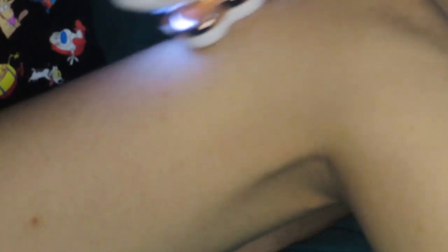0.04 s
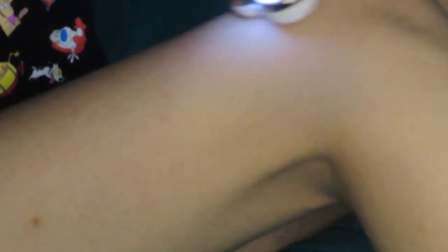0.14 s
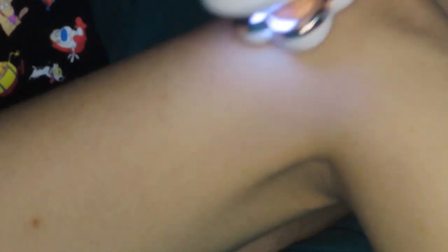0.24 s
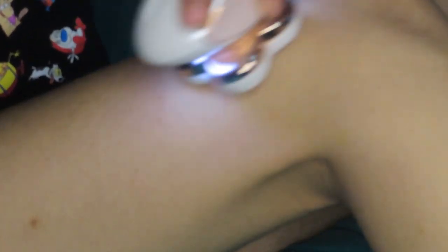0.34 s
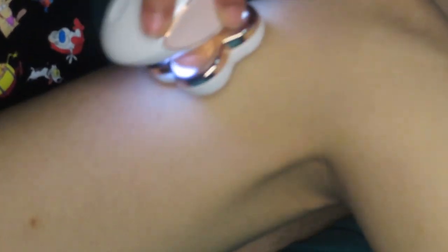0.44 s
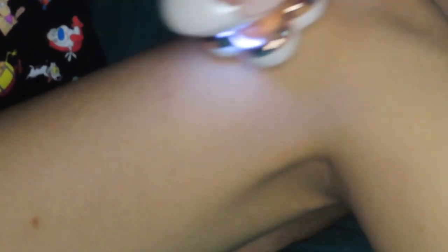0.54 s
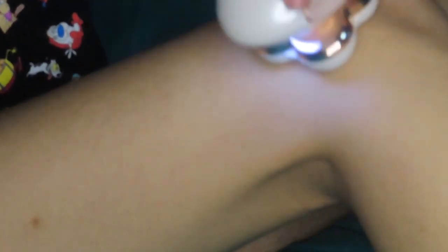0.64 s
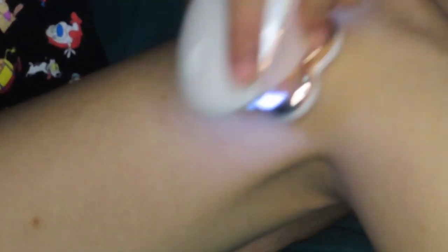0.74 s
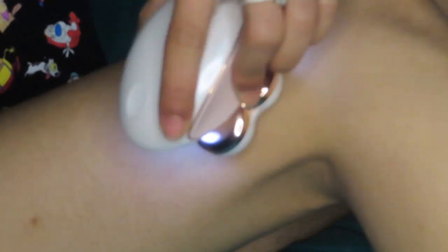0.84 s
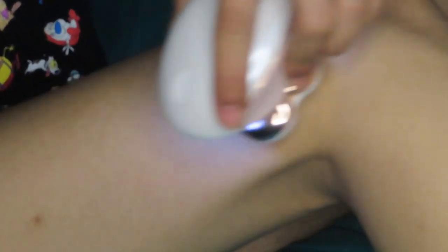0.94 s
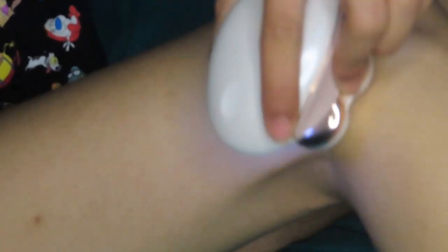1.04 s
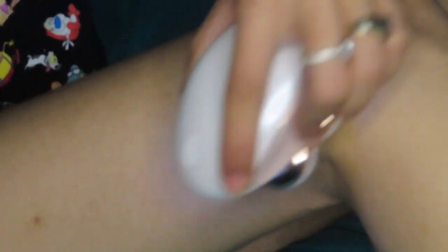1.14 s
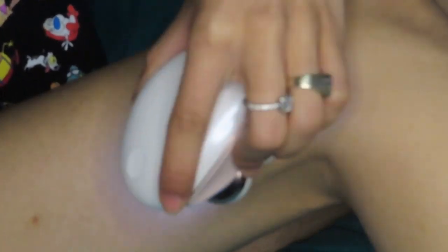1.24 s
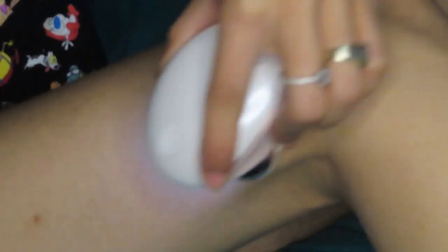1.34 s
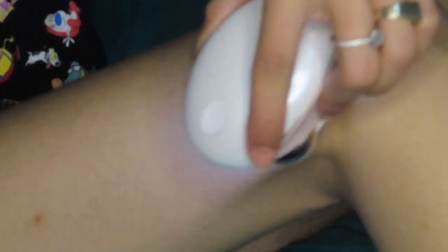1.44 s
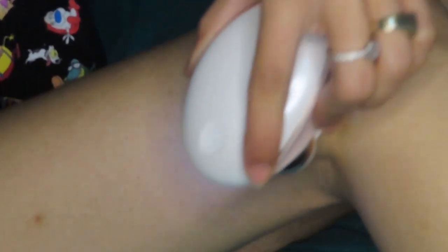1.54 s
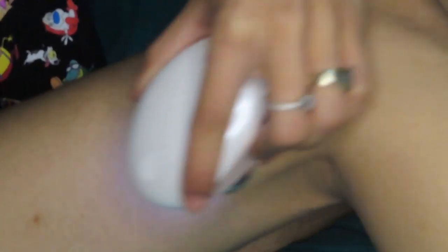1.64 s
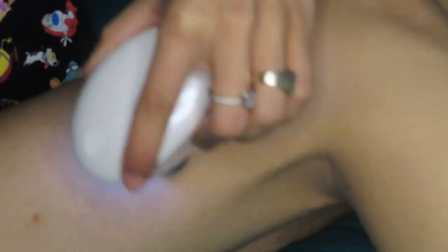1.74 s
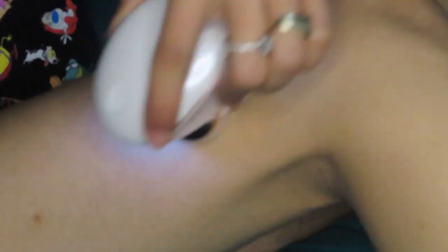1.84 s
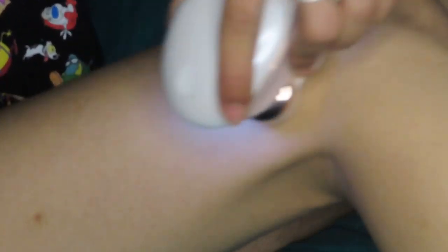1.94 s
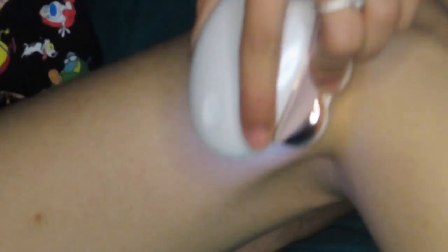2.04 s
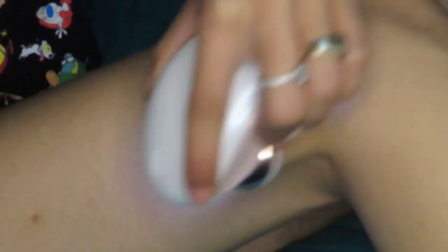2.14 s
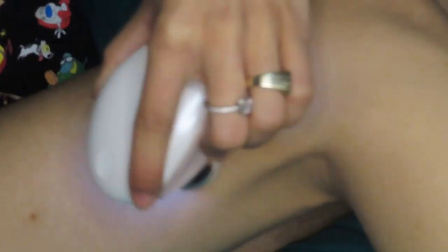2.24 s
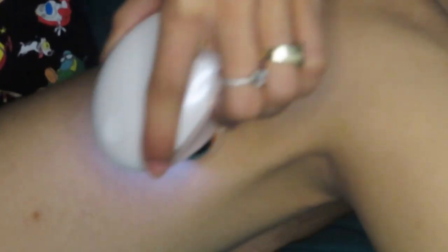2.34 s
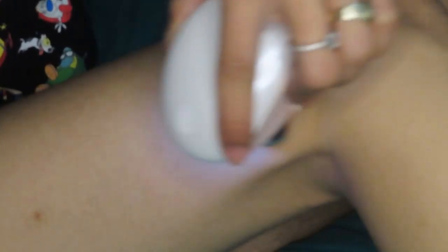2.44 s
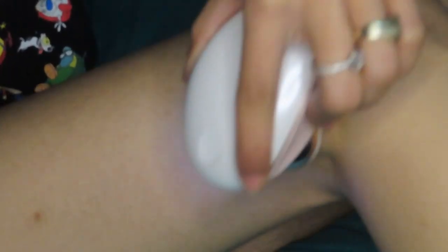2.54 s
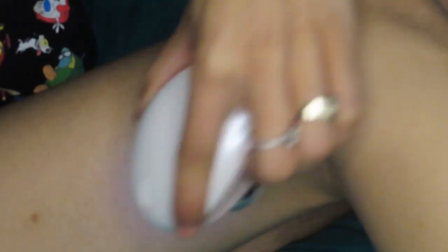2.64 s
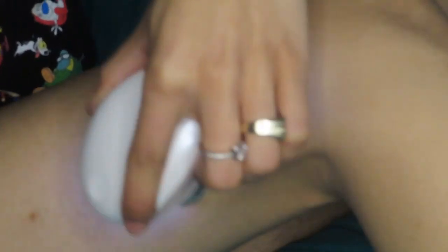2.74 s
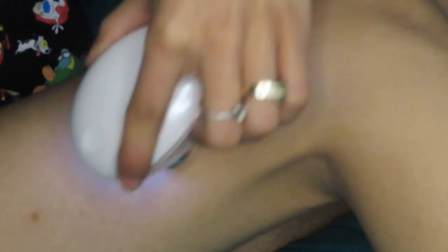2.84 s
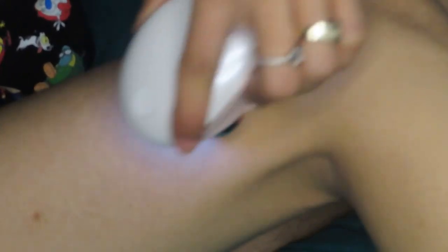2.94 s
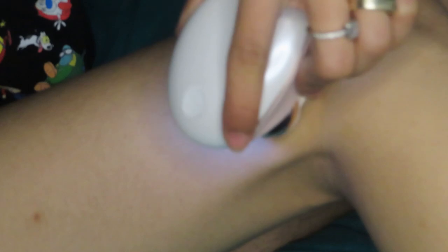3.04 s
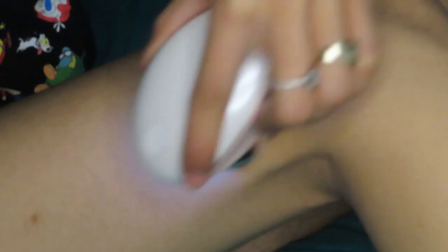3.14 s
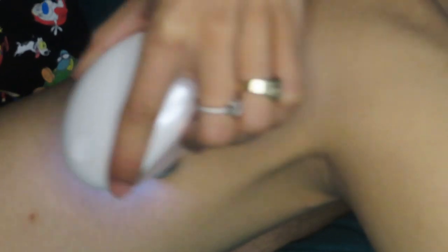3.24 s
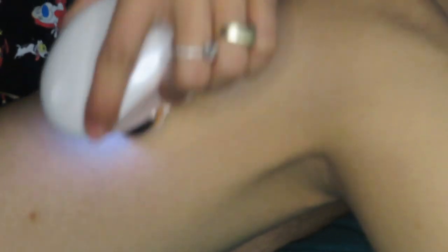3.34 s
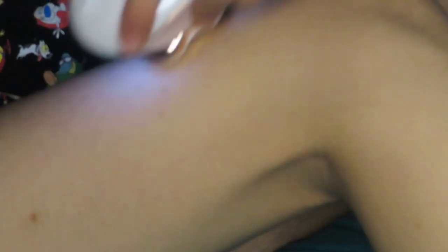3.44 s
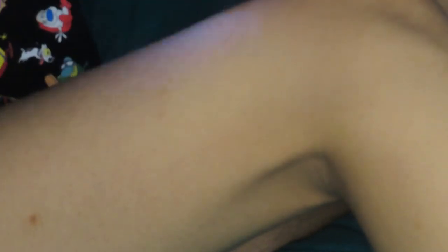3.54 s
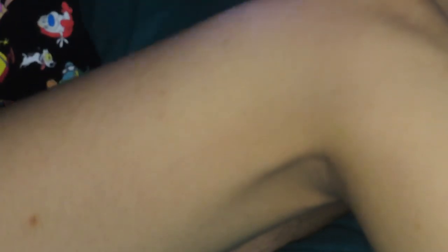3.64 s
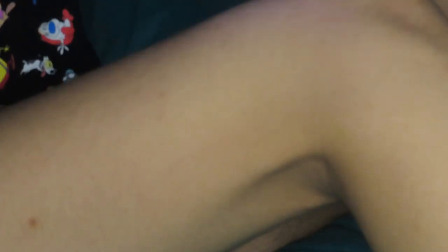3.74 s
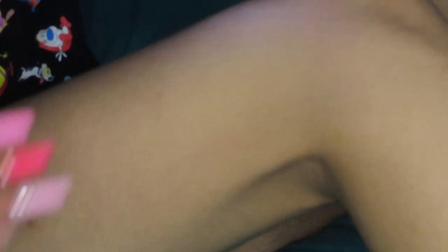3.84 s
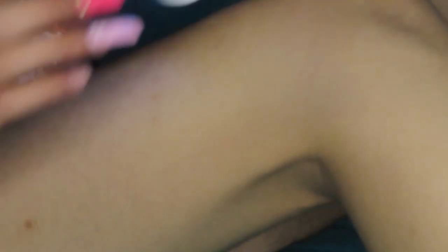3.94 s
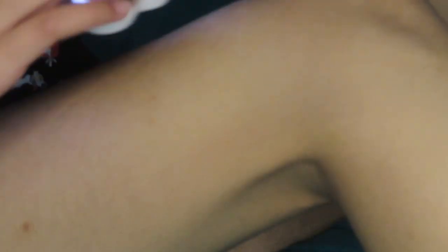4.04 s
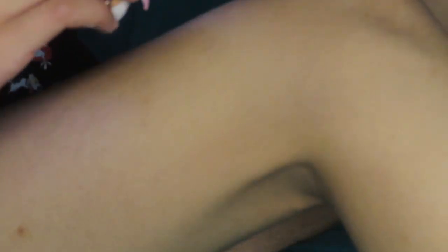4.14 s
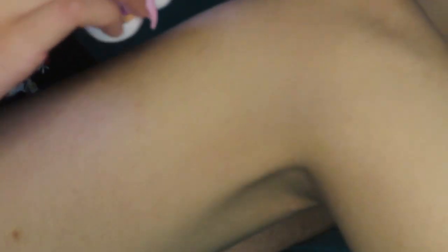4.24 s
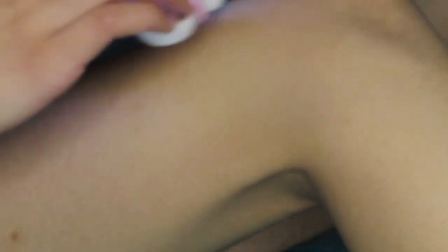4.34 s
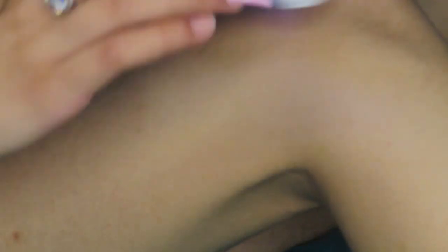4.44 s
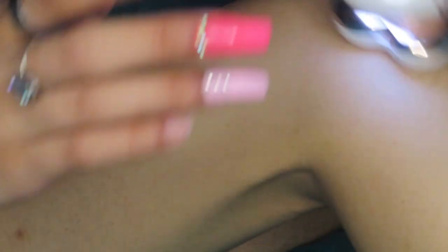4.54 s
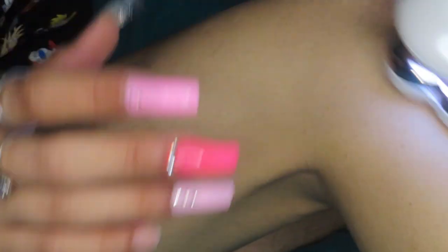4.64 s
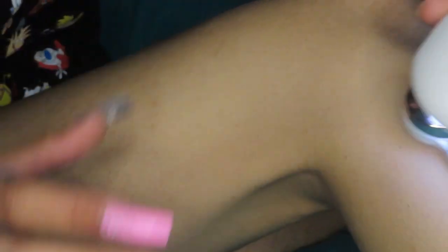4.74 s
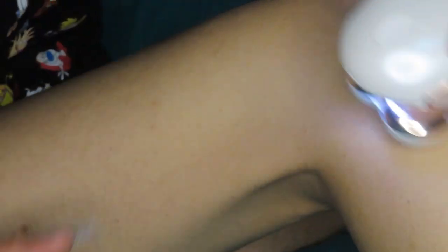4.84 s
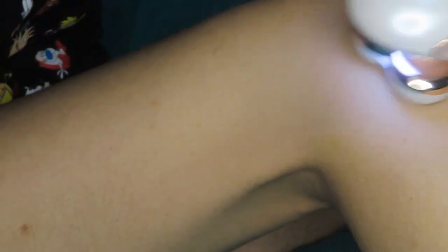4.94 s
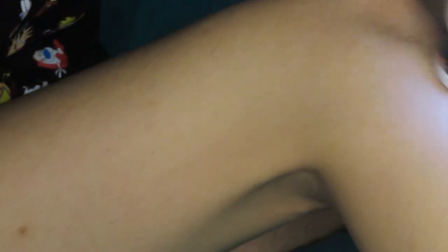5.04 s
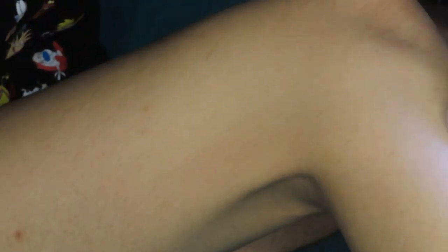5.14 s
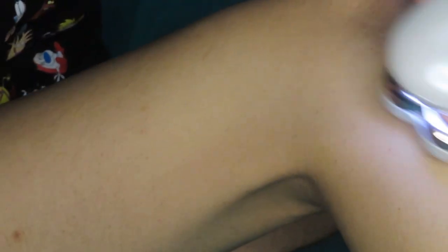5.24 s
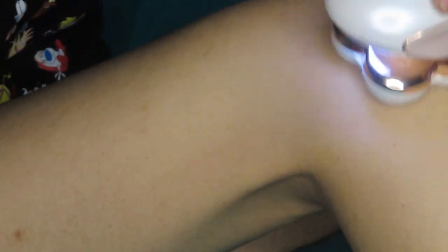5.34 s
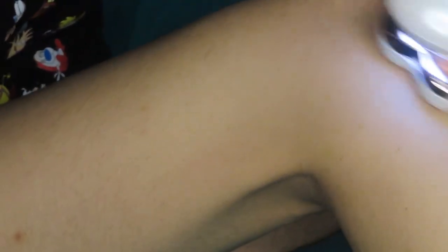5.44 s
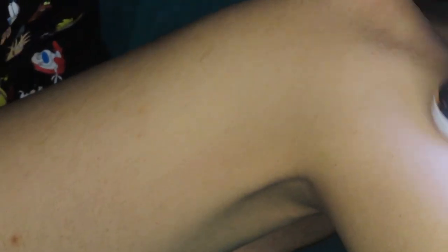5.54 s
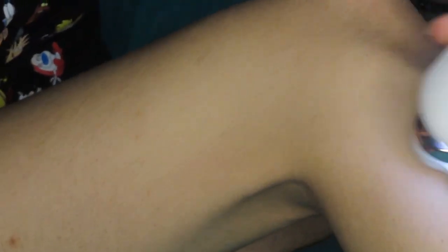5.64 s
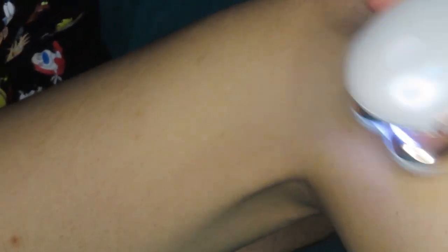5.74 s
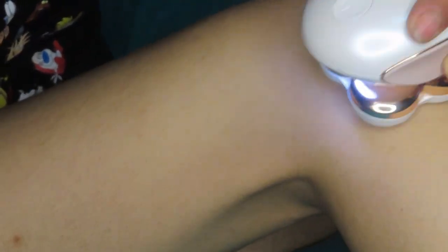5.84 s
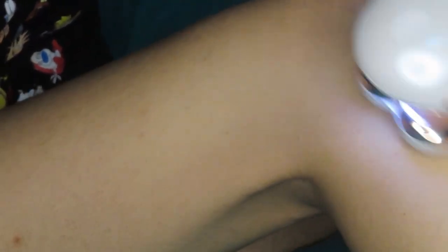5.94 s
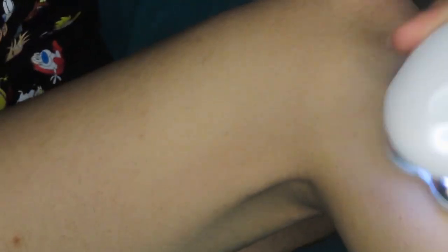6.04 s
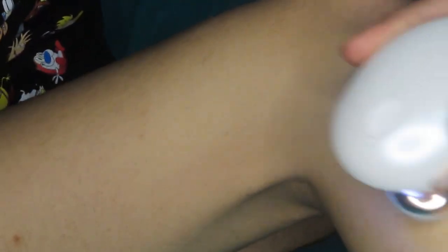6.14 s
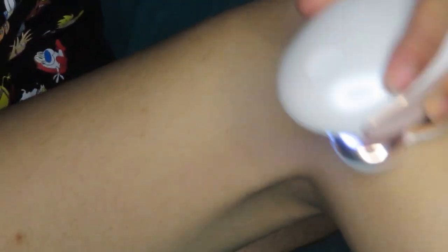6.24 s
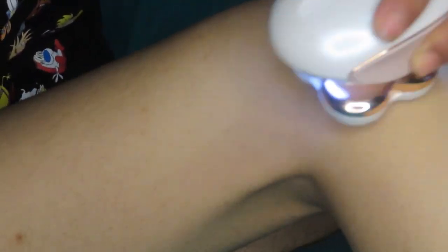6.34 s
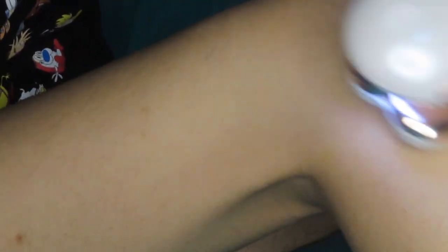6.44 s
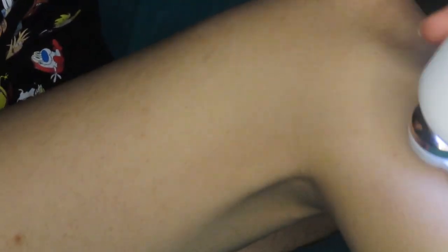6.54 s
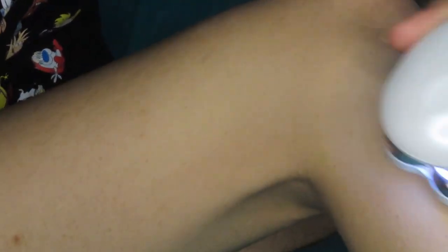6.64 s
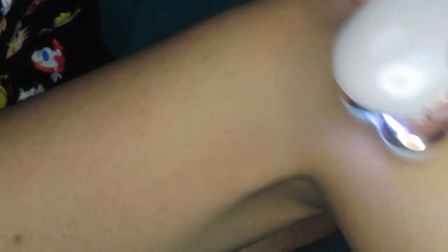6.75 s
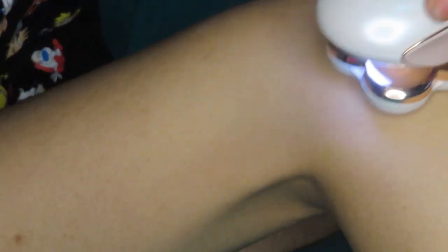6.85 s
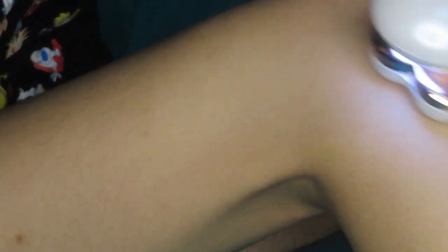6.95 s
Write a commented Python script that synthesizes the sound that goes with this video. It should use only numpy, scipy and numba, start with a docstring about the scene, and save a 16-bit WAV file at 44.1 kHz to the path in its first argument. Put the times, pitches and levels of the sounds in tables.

```python
"""A small battery hair remover strokes over a leg near a phone, in a quiet room with ventilation and a faint tone.
Gear teeth whine as sums of sines; the rattle is ticking noise, with clatter that repeats with the gear train.
The casing colours this as the hold changes; air pockets and cutter guard add resonances that wander unevenly.
After about 3.5 s it is lifted briefly and runs freer; one tap at about 4.1 s rings decaying tones.
Soft bumps of fingers settling follow the tap, then one more at about 5 s, while the strokes go on."""
import sys
import numpy as np
from scipy import signal
from scipy.fft import rfft, irfft, next_fast_len
from scipy.io import wavfile
from scipy.ndimage import uniform_filter1d
from numba import njit

SR = 44100
rng = np.random.default_rng(int(sys.argv[2]) if len(sys.argv) > 2 else 0)


def to_linear_factor(level_db):
    """Convert decibel levels (scalar or array-like) to linear amplitude factors."""
    exponent = np.asarray(level_db, float) / 20
    return 10 ** exponent


def master(y):
    """Save y as 16-bit WAV."""
    cut = np.clip(np.atleast_2d(y).T, -1, 1)
    pcm = np.round(cut * 32767)  # scale
    wavfile.write(sys.argv[1], SR, pcm.astype(np.int16))


N = 309141
T = np.arange(N) / SR  # time in s
SIZE = next_fast_len(N)
F = np.maximum(np.arange(SIZE // 2 + 1) * SR / SIZE, 1)  # frequencies in Hz

# motor speed, slower under load: t/s, speed/(turns per s)
MOTOR_SPEED = [(0.0, 153.5), (1.26, 153.4), (1.54, 155.4), (1.7, 154), (1.96, 156.1), (2.2, 154.3),
               (2.45, 156.2), (2.75, 155.1), (2.94, 156.4), (3.45, 155.4), (3.66, 158.3), (4.25, 159.3),
               (4.5, 159.2), (4.78, 155.2), (5.18, 155), (5.42, 153.4), (5.65, 154.2), (5.88, 153.2),
               (6.14, 155), (6.3, 154), (6.46, 155.4), (7.0, 153.4)]
FREE_FROM_HZ, FREE_AT_HZ = 156.6, 158.2  # motor turns per s where drag starts to go, and is gone
TURNS = 9  # motor turns until the gear train repeats (four cutter turns)
CLATTER_DB = -11  # against the rattle

# steadier gear whines: cycles per repeat of the train
STEADY_CYCLES = [92, 96, 99, 108, 147, 156, 165, 183, 188, 220, 225, 236, 240, 244, 249, 270, 273, 291, 306,
                 336]
# their relative strengths, one row per whine: level/dB on skin, level/dB running free
STEADY_LEVELS = [(5, -4), (7, 6), (-5, 0), (5, 10), (-5, 11), (4, 15), (-10, 7), (-10, 5), (7, 3),
                 (-7, -10), (2, 10), (3, 5), (0, 12), (12, 11), (-10, 6), (7, 7), (4, 11), (0, 10),
                 (-10, 9), (10, 13)]
# whines that swell and fade more slowly: cycles per repeat of the train
TURNING_CYCLES = [84, 112, 116, 120, 124, 128, 132, 135, 224]
# their relative strengths, one row per whine: level/dB on skin, level/dB running free
TURNING_LEVELS = [(12, 12), (12, 9), (9, 6), (10, 15), (14, 8), (8, 17), (10, 4), (7, 6), (11, 0)]
TURNING_DB, TURNING_PER_S = 3, 4  # depth and pace of that swell

# blades passing under the air cup: times per repeat of the train, depth (0-1)
BLADE_THROB = [(4, .1), (8, .25), (12, .2)]

# tone of the casing, relative: f/Hz, level/dB per Hz
CASING_TONE = [(350, -31.5), (600, -32), (727, -41), (801, -31), (869, -17.5), (997, -14), (1290, -10),
               (2180, 3), (3040, 13.5), (3940, -2.5), (5480, -31.5), (9360, -27), (10900, -32.5),
               (15100, -39.5), (15600, -50), (15900, -80)]
# resonances of metal parts: f/Hz, width/Hz, gain/dB at the centre
METAL_RINGS = [(3760, 770, -1), (6070, 2800, 8), (9480, 550, 4), (11870, 300, 4)]
# borders between the casing's resonance zones: f/Hz
ZONE_BORDERS = [1700, 2500, 3500, 4800, 6500, 8700, 10800]
# the hand's hold, each roughly -1 to 1 around the mean: t/s, contact with the skin,
# cutter side facing the phone, cover over the blade tips, tilt of the head that vents the air cup
HAND_GRIP = [(0.0, -0.24, 0.13, -0.088, -0.27), (0.14, -0.95, -0.54, -0.1, -0.043),
             (0.32, -0.23, 0.38, 0.1, 0.36), (0.46, -0.47, -0.07, 0.2, 0.38),
             (0.68, -0.12, 0.38, -0.02, 0.22), (0.92, 0.13, -0.31, 0.16, 0.69),
             (1.04, 0.31, 0.66, -0.21, -0.078), (1.12, 0.24, -0.056, -0.027, 0.11),
             (1.28, 0.43, -0.68, 0.23, 0.27), (1.56, 0.5, 0.47, -0.37, -0.4),
             (1.66, 0.83, -0.52, 0.027, -0.0044), (1.82, -0.12, -0.45, 0.12, 0.12),
             (2.06, 0.1, 0.55, -0.38, -0.024), (2.16, 0.38, -0.6, 0.23, 0.4),
             (2.38, 0.12, -0.3, 0.0058, 0.088), (2.58, 0.56, -0.065, -0.28, -0.31),
             (2.72, 0.53, -0.84, 0.29, 0.062), (2.84, 0.48, -0.078, 0.0055, -0.12),
             (2.96, -0.38, -0.56, 0.019, 0.33), (3.1, 0.44, 0.16, -0.46, -0.19),
             (3.26, 0.33, -0.75, 0.22, 0.28), (3.52, -0.74, -0.11, -0.13, 0.11),
             (3.86, -1.23, -0.094, -0.26, -0.098), (4.32, -0.19, -0.079, -0.071, 0.21),
             (4.46, -0.23, 0.015, -0.27, -0.011), (4.68, -0.32, 0.58, 0.061, -0.098),
             (4.78, 0.08, -0.35, 0.34, -0.03), (5.02, -0.52, 0.57, 0.31, -0.13),
             (5.12, -0.77, 0.0098, 0.16, -0.15), (5.28, -0.0071, 0.063, 0.26, -0.035),
             (5.38, -0.21, 0.75, 0.057, 0.027), (5.5, -0.77, 0.52, 0.1, -0.047),
             (5.68, -0.047, -0.025, 0.39, -0.11), (5.86, -0.55, 0.45, 0.4, 0.28),
             (6.12, 0.47, 0.049, 0.17, -0.42), (6.2, -0.29, 0.14, 0.092, -0.034),
             (6.4, -0.84, 0.41, -0.11, -0.11), (6.48, -0.23, 0.63, 0.00015, -0.24),
             (6.68, 0.16, 0.28, 0.29, -0.49), (6.78, -0.2, 0.78, 0.15, -0.08),
             (7.0, -0.49, 0.32, 0.077, 0.11)]
# how each part answers the hold: level/dB at rest, then change/dB per unit of contact, of facing,
# of cover, of tilt, and change/dB when running free
PART_RESPONSE = {"shell lows": (-39.5, 5, 4.5, 2, 4, 1.5), "shell mids": (-38.5, 2, 0, -2, -3, -1),
                 "shell highs": (-38.5, 1.5, 1.5, -7, 4.5, -5.5), "gap": (-48, 0, -0.5, -7, -4, 4),
                 "blades": (-49.5, -2, 6.5, 4.5, 4.5, -1), "blade tips": (-53, -0.5, 2.5, -17, 7, 0.5),
                 "sizzle": (-55, -1.5, 4, 3, 0.5, 0), "sound from the walls": (4, 0.3, 3.5, 2, -1, -0.5),
                 "left minus right": (-0.59, -0.33, -0.37, -1.7, 0.35, 0.0)}

# resonances of the cup under the head and the hollow between the fingers, pitch and level
# wandering unevenly: t/s, cup f/Hz, cup level/dB, hollow f/Hz, hollow level/dB
AIR_POCKETS = [
    [(0.0, 2100, -45, 2990, -49), (0.01, 2100, -38, 2980, -33), (0.07, 2180, -39.5, 3050, -39),
     (0.41, 2100, -33.5, 2750, -32.5), (0.46, 2000, -34.5, 2900, -39), (0.68, 2230, -29, 2800, -32),
     (0.81, 2070, -33, 3210, -40), (0.96, 2060, -30.5, 3140, -48), (1.05, 2180, -27, 3060, -34),
     (1.11, 2180, -29.5, 2800, -56), (1.35, 2130, -32.5, 2820, -38), (1.44, 2160, -29, 2930, -52),
     (1.46, 2220, -29, 2840, -31), (1.47, 2220, -32, 2700, -52), (1.49, 2260, -33, 2650, -30),
     (1.52, 2240, -32, 2680, -52), (1.53, 2240, -31, 2720, -38), (1.65, 2140, -27, 2720, -50),
     (1.7, 2070, -41, 2910, -52), (1.74, 2080, -32, 2900, -38), (1.9, 2160, -35.5, 2830, -37),
     (2.0, 2220, -32, 2790, -53)],
    [(2.0, 2260, -27, 3130, -46), (2.02, 2230, -30, 2950, -43), (2.09, 2100, -29.5, 3180, -55),
     (2.22, 2160, -33, 2960, -51), (2.34, 2200, -32.5, 2910, -34.5), (2.48, 2200, -30.5, 3100, -45),
     (2.58, 2170, -26, 2950, -47), (2.62, 2140, -28.5, 2890, -41), (2.73, 2100, -36, 2830, -46),
     (2.79, 2300, -27.5, 2990, -37), (2.9, 2260, -34, 3020, -38), (3.07, 2240, -31, 2880, -43),
     (3.1, 2240, -25.5, 2850, -42), (3.2, 2080, -31, 3130, -51), (3.3, 2150, -38.5, 3140, -40),
     (3.36, 2080, -30, 3010, -38), (3.5, 2190, -46, 3000, -41), (3.61, 2190, -44, 3130, -37),
     (3.74, 2180, -34, 3160, -36), (3.82, 2190, -42, 3100, -37), (4.01, 2100, -38, 2900, -34),
     (4.1, 2160, -42, 3010, -38)],
    [(4.22, 2210, -45, 3000, -35), (4.376, 2240, -42, 2900, -40), (4.488, 2220, -34.5, 3130, -40),
     (4.496, 2190, -37, 3070, -35), (4.518, 2180, -49, 3020, -50), (4.526, 2170, -34, 2990, -35),
     (4.534, 2210, -49, 2970, -36), (4.642, 2330, -37, 2780, -31), (4.788, 2260, -46, 2980, -36),
     (4.804, 2170, -37, 2960, -45), (4.822, 2170, -36, 2960, -34), (4.834, 2160, -37, 2910, -47),
     (4.896, 2200, -44, 2770, -30), (4.922, 2130, -36, 2780, -33), (5.022, 2240, -34, 3100, -34),
     (5.118, 2140, -48, 3020, -32.5), (5.142, 2170, -45, 3050, -43), (5.206, 2220, -39, 2990, -31),
     (5.264, 2250, -45, 3020, -50), (5.272, 2290, -39, 2870, -39), (5.388, 2260, -31.5, 2900, -32.5),
     (5.6, 2300, -39, 3060, -36)],
    [(5.6, 2230, -38, 2990, -40), (5.662, 2120, -33, 2850, -34), (5.696, 2160, -35, 3030, -50),
     (5.704, 2230, -38, 2950, -36), (5.72, 2220, -40, 3100, -41), (5.806, 2230, -31.5, 2870, -33),
     (5.958, 2300, -36, 2730, -33), (6.044, 2160, -30.5, 3150, -38), (6.184, 2310, -33, 2900, -37),
     (6.246, 2200, -39.5, 3020, -40), (6.312, 2210, -33.5, 2700, -34.5), (6.464, 2130, -36, 2770, -35.5),
     (6.504, 2120, -25, 2740, -31), (6.542, 2230, -39, 2880, -36), (6.632, 2250, -27, 2980, -42),
     (6.656, 2220, -31, 2900, -38), (6.698, 2230, -38, 2870, -45), (6.78, 2350, -29.5, 2700, -26),
     (6.84, 2210, -42, 2900, -36), (6.85, 2170, -24, 2800, -30), (6.918, 2220, -39, 3100, -35.5),
     (7.0, 2230, -34, 3190, -37)],
]
# width of the cup's resonance: t/s, width/Hz
CUP_WIDTH = [(0.0, 650), (0.9, 547), (3.3, 510), (3.7, 400), (4.2, 450), (4.6, 700), (7.0, 750)]
# ringing of the cutter guard, which swells as it turns to the phone: t/s, f/Hz, level/dB
GUARD_RING = [
    [(0.0, 3860, -41), (0.04, 3760, -36), (0.08, 3880, -45.5), (0.46, 3900, -38), (0.49, 3790, -50),
     (0.5, 3760, -39), (1.32, 3830, -36.5), (1.36, 3770, -48), (1.53, 3940, -39), (1.72, 3870, -40),
     (1.84, 3890, -53), (1.85, 4040, -33), (1.89, 3820, -45), (2.11, 4060, -38), (2.21, 3770, -40),
     (2.45, 3820, -41), (2.47, 3800, -54), (2.56, 3770, -46), (2.67, 3940, -37), (2.69, 3860, -50),
     (3.2, 3720, -38), (3.32, 3750, -45), (3.45, 3840, -39), (3.86, 3750, -58), (3.98, 3870, -46),
     (4.1, 3790, -55)],
    [(4.22, 3650, -48), (4.46, 3800, -52), (4.55, 3850, -40), (4.56, 3910, -53), (4.6, 3830, -52),
     (4.61, 3700, -36), (4.63, 3700, -65), (4.75, 3870, -41), (5.01, 3780, -37.5), (5.16, 3950, -55),
     (5.18, 4000, -40), (5.33, 3830, -41), (5.38, 3750, -37), (5.71, 4030, -41), (5.88, 3700, -32),
     (6.0, 3870, -40.5), (6.36, 3840, -40.5), (6.38, 3960, -51), (6.39, 3800, -44), (6.5, 3870, -36),
     (6.53, 3960, -51), (6.6, 3900, -39), (6.71, 3860, -38), (6.75, 3760, -35), (6.94, 3680, -36),
     (7.0, 3770, -45)],
]
HOLLOW_WIDTH_HZ, GUARD_WIDTH_HZ = 695, 660
SMOOTHING_S = .06  # rounds off the pitch and level of pockets and guard

# buzz from the sides, relative: f/Hz, level/dB per Hz
WALL_TONE = [(470, -45), (800, -27), (1050, -14), (1470, -11.5), (1820, -3.5), (1970, -8), (4100, -0.5),
             (4770, -3.5), (5540, -16.5), (7570, -12), (8570, -18), (9470, -10), (11400, -23), (13900, -13),
             (15500, -31), (15900, -70)]
WALLS_DB = -46.5  # before the swell of the hold
ROOM_T60_S, ROOM_DB, TAP_ROOM_DB = .22, -13, -7  # time to fade 60 dB; room against device, against tap

# ventilation rush, relative: f/Hz, level/dB per Hz
RUSH_TONE = [(12, -38), (20, -4), (59, 4), (144, -3), (222, -6), (305, -9.5), (393, -7.5), (426, -6),
             (507, -10), (576, -2), (732, -8), (792, -32), (900, -2), (1170, -2.5), (1980, -120)]
RUSH_DB = -48.5
# ventilation hums: f/Hz, width/Hz, level/dB
VENT_HUMS = [(56.2, 9.3, -57), (121, 14, -76), (443, 2.7, -66.5), (566, 53, -82), (805.7, 55, -55)]
# ventilation, side against mid: f/Hz, level/dB
VENT_SIDE = [(30, -36), (60, -33), (110, -15), (200, -2.5), (380, 1.5), (700, -7), (1000, -5)]
# a faint low tone that comes and goes: t/s, f/Hz, level/dB
DRONE_PATH = [(0.0, 233.3, -61), (0.4, 226, -68), (0.5, 226.4, -53.5), (0.9, 215, -62), (1.2, 222, -60),
              (1.7, 222, -76), (6.79, 362, -69), (6.85, 359, -55), (6.93, 360, -59), (7.0, 355, -63)]

# the tap: t/s, level/dB
TAPS = [(4.124, -1)]
# the tap's ringing tones, relative: f/Hz, level/dB, time to fade 60 dB/s
TAP_TONES = [(400, -24.5, 0.035), (900, -22, 0.02), (1190, 0.5, 0.012), (1487, -12, 0.055),
             (1890, -10, 0.027), (2230, 4.5, 0.0053), (2700, -1, 0.014), (3067, 4, 0.0054),
             (3700, -8, 0.0088), (4530, -25, 0.004), (6000, -20, 0.0037), (7380, -8, 0.006),
             (8050, -9, 0.0028), (10020, -14, 0.005), (11360, -21, .003), (12800, -19, 0.0033),
             (15500, -26, .003)]
# answers of near surfaces to the tap: delay/s, level/dB
NEAR_ECHOES = [(.0024, -20), (.006, -11.5), (.0125, -35), (0.021, -16), (.030, -28), (.041, -19),
               (.052, -16)]
TAP_RISE_S = .0012

# fingers settle on the casing: t/s, level/dB before rise and decay, f/Hz
FINGER_BUMPS = [(4.205, -35, 543), (4.241, -32, 586), (4.286, -32, 211), (5.04, -38, 310)]
KNOCK_T60_S = 0.047


def unit(x):
    """Scale to rms 1."""
    return x / np.sqrt(np.mean(x ** 2))


def colour(x, gain):
    """Filter by a gain per frequency."""
    return irfft(rfft(x, SIZE) * gain, SIZE)[..., :N]


def shape(points):
    """Gain per frequency through (f/Hz, level/dB) points."""
    hz, db = np.transpose(points)
    return to_linear_factor(np.interp(np.log(F), np.log(hz), db))


def bell(hz, width):
    """Resonance curve with peak 1."""
    return 1 / (1 + (2 * (F - hz) / width) ** 2)


def walk(rate):
    """Smooth chance, about rate changes a second, spread near 1."""
    knots = rng.standard_normal(int(N / SR * rate) + 3)
    place = T * rate
    before = place.astype(int)
    blend = .5 - .5 * np.cos(np.pi * (place % 1))
    return 1.2 * (knots[before] * (1 - blend) + knots[before + 1] * blend)


def smoothed(tables):
    """Columns of a wandering curve, per sample and rounded off."""
    s, *columns = np.concatenate(tables).T
    return [uniform_filter1d(np.interp(T, s, c), int(SMOOTHING_S * SR)) for c in columns]


@njit
def resonate(x, hz, width):
    """State-variable band-pass with a moving centre and width."""
    y, band, low = np.empty(len(x)), 0., 0.
    for i in range(len(x)):
        g, k = np.tan(np.pi * hz[i] / SR), width[i] / hz[i]
        v = (band + g * (x[i] - low)) / (1 + g * (g + k))
        band, low, y[i] = 2 * v - band, low + 2 * g * v, k * v
    return y


def running_free():
    """Motor speed, and how far it has left the skin's drag (0-1)."""
    hz = np.interp(T, *np.transpose(MOTOR_SPEED))
    return hz, np.clip((hz - FREE_FROM_HZ) / (FREE_AT_HZ - FREE_FROM_HZ), 0, 1)


def throbbing(train, pulses):
    """Loudness that pulses in step with the gear train."""
    return 1 + sum(depth * np.cos(2 * np.pi * times * train) for times, depth in pulses)


def gears():
    """Uncoloured shaking of the mechanism: rattle with clatter, tooth whine, and the blades' throb."""
    hz, free = running_free()
    # repeats of the gear train so far; speed wavers only under drag
    train = np.cumsum(hz * (1 + 0.000615 * (1 - free) * walk(25))) / SR / TURNS
    # the rattle throbs with motor, idler and cutter shafts
    throb = throbbing(train, [(TURNS, .15), (TURNS // 3, .05), (TURNS // 2, .03)])
    # blades catch: sparse sharp ticks over a dense rattle
    ticks = rng.standard_normal(N) * to_linear_factor(1.84 * rng.exponential(size=N))
    rattle = unit(ticks * throb * to_linear_factor(0.6 * walk(30)))
    # every tooth has its own flaw, so part of the clatter comes round again
    flaws = rng.standard_normal(2560)
    clatter = np.interp(train % 1, np.arange(2560) / 2560, flaws, period=1)
    noise = rattle + to_linear_factor(CLATTER_DB) * unit(clatter)
    whine = 0
    for cycles, (skin_db, free_db) in zip(STEADY_CYCLES, STEADY_LEVELS):
        flicker_db = (3.5 - 3.6 * free) * walk(8.1)
        db = -33.0 + skin_db + (free_db - skin_db) * free + flicker_db
        whine = whine + to_linear_factor(db) * np.sin(2 * np.pi * (cycles * train + rng.random()))
    for cycles, (skin_db, free_db) in zip(TURNING_CYCLES, TURNING_LEVELS):
        flicker_db = TURNING_DB * walk(TURNING_PER_S) + 2.4 * walk(20)
        db = -37.5 + skin_db + (free_db - skin_db) * free + flicker_db
        whine = whine + to_linear_factor(db) * np.sin(2 * np.pi * (cycles * train + rng.random()))
    return noise, whine, throbbing(train, BLADE_THROB)


def casing(noise, whine, zones_db, repeat):
    """The plastic shell resonates in zones, which the grip damps or frees."""
    rings = np.prod([1 + (to_linear_factor(db) - 1) * bell(hz, width) for hz, width, db in METAL_RINGS], axis=0)
    body = rfft(noise + whine, SIZE) * shape(CASING_TONE) * rings
    below = [0 * F] + [1 / (1 + (F / hz) ** 16) for hz in ZONE_BORDERS] + [0 * F + 1]
    masks = [high - low for low, high in zip(below, below[1:])]
    del masks[2]  # this range is the hollow's
    out = 0
    for k, (db, mask) in enumerate(zip(zones_db, masks)):
        # the upper zones rattle independently, so they are shifted by one repeat
        zone = np.roll(irfft(body * mask, SIZE)[:N], (k // 4) * repeat)
        out = out + to_linear_factor(db + 1.0 * walk(14)) * unit(zone)
    return out


def pocket(drive, hz, width, db):
    """A small resonator, driven by the shaking, whose pitch and level move; two band-passes in a row."""
    narrow = resonate(drive, hz, width + 0 * hz)
    ringing = resonate(narrow, hz, 2.5 * width + 0 * hz)
    return to_linear_factor(db + 1.0 * walk(28)) * unit(ringing)


def remover(noise, whine, blades, zones_db):
    """The casing, two air pockets and the cutter guard each colour the shaking of the gears."""
    repeat = int(SR * TURNS / np.mean(np.transpose(MOTOR_SPEED)[1]))  # samples per repeat of the train
    cup_hz, cup_db, hollow_hz, hollow_db = smoothed(AIR_POCKETS)
    guard_hz, guard_db = smoothed(GUARD_RING)
    cup_width = np.interp(T, *np.transpose(CUP_WIDTH))
    # the hollow sits over another cutter, which runs about one turn behind
    behind = np.roll(noise, SR // 69)
    out = casing(noise, whine, zones_db, repeat)
    out = out + pocket(noise * blades + whine, cup_hz, cup_width, cup_db)
    out = out + pocket(behind + whine, hollow_hz, HOLLOW_WIDTH_HZ, hollow_db)
    return out + pocket(np.roll(noise, 2 * repeat) + whine, guard_hz, GUARD_WIDTH_HZ, guard_db)


def room(x):
    """Diffuse tail of a small furnished room: fading noise of energy 1."""
    t = T[:SR // 3]
    tail = rng.standard_normal(len(t)) * to_linear_factor(-60 * t / ROOM_T60_S) * (t > .004)
    return signal.fftconvolve(x, tail / np.sqrt(np.sum(tail ** 2)))[:len(x)]


def wall_buzz(noise, whine, swell_db):
    """The shaking comes back off the walls, blurred by the room and swelling with the hold."""
    return to_linear_factor(WALLS_DB + swell_db) * unit(colour(room(noise + whine), shape(WALL_TONE)))


def ventilation():
    """Low rush of filtered noise with narrow wavering hums, as mid and side."""
    rush = to_linear_factor(RUSH_DB) * unit(colour(rng.standard_normal((2, N)), shape(RUSH_TONE)))
    for hz, width, db in VENT_HUMS:
        rush = rush + to_linear_factor(db) * unit(colour(rng.standard_normal((2, N)), bell(hz, width)))
    return np.array([rush[0], colour(rush[1], shape(VENT_SIDE))])


def drone():
    """A faint wavering tone from somewhere in the building: one gliding sine."""
    s, hz, db = np.transpose(DRONE_PATH)
    turns = np.cumsum(np.interp(T, s, hz)) / SR
    return np.sqrt(2) * np.interp(T, s, to_linear_factor(db), right=0) * np.sin(2 * np.pi * turns)


def tap():
    """A fingernail knocks on the plastic casing, which rings; near surfaces and room answer. Mid and side."""
    t = T[:SR // 2]
    ring = 0
    for hz, db, t60 in TAP_TONES:
        fade_db = -60 * np.maximum(t - TAP_RISE_S, 0) / t60
        ring = ring + to_linear_factor(db + fade_db) * np.sin(2 * np.pi * hz * t)
    ring = ring * np.clip(t / TAP_RISE_S, 0, 1) ** 1.3
    # a small shell radiates no bass
    no_bass = signal.butter(3, 380, "high", fs=SR, output="sos")
    ring = signal.sosfilt(no_bass, ring / np.max(np.abs(ring)))
    # the answers in the mid are duller
    dull = signal.sosfilt(signal.butter(1, 3500, fs=SR, output="sos"), ring)
    echoes = sum(to_linear_factor(db) * np.roll(dull, int(lag * SR)) for lag, db in NEAR_ECHOES)
    mid = ring + echoes + to_linear_factor(TAP_ROOM_DB) * room(dull)
    side = to_linear_factor(-26) * (ring + room(ring))
    out = np.zeros((2, N))
    for s, db in TAPS:
        out[:, int(s * SR):int(s * SR) + len(t)] += to_linear_factor(db) * np.array([mid, side])
    return out


def knocks():
    """Fingers settle on the casing: soft dull bumps, each a short fading sine."""
    out, t = np.zeros(N), T[:SR // 8]
    for s, db, hz in FINGER_BUMPS:
        envelope = to_linear_factor(db - 60 * t / KNOCK_T60_S) * (1 - np.exp(-t / 0.0028))
        out[int(s * SR):int(s * SR) + len(t)] += envelope * np.sin(2 * np.pi * hz * t)
    return out


def scene():
    """Device and tap come from near the middle; wall buzz and ventilation widen the sound."""
    s, *columns = np.transpose(HAND_GRIP)
    grip = [np.interp(T, s, c) for c in columns]
    hold = np.array([np.ones(N), *grip, running_free()[1]])
    *zones_db, swell_db, pan_db = np.array(list(PART_RESPONSE.values())) @ hold
    noise, whine, blades = gears()
    device = remover(noise, whine, blades, zones_db)
    walls = wall_buzz(noise, whine, swell_db)
    middle = to_linear_factor(ROOM_DB) * room(device) + drone() + knocks()
    mid, side = ventilation() + tap() + np.array([middle, walls])
    # pan_db is left minus right
    return device * to_linear_factor(np.array([pan_db, -pan_db]) / 2) + np.array([mid + side, mid - side])


def roll_off(x):
    """The treble ends steeply here."""
    return signal.sosfilt(signal.butter(12, 16970, fs=SR, output="sos"), x)


def record(dry):
    """The phone recording holds little above about 16.8 kHz."""
    mix = colour(dry, 1 / (1 + (F / 16800) ** 60))
    return roll_off(mix)


dry = scene()
out = record(dry)
master(out)
```